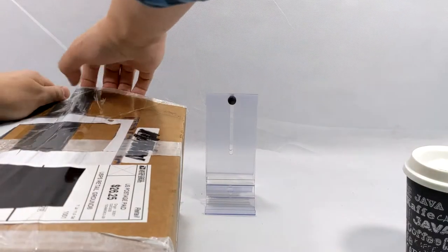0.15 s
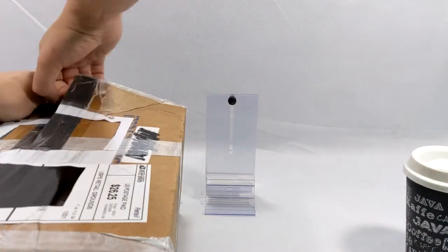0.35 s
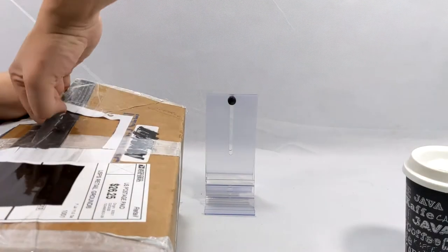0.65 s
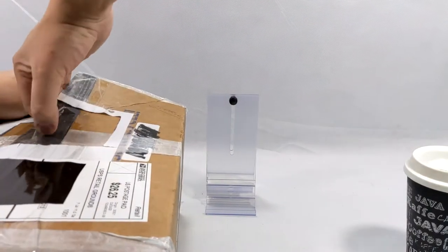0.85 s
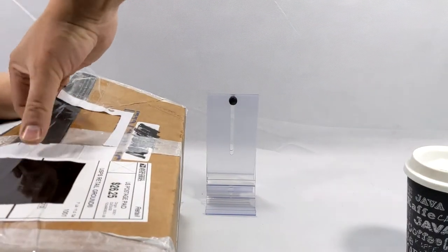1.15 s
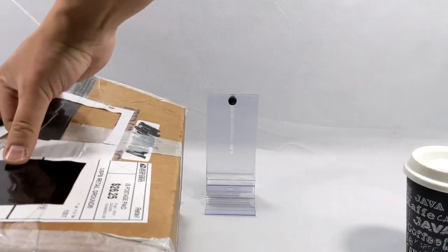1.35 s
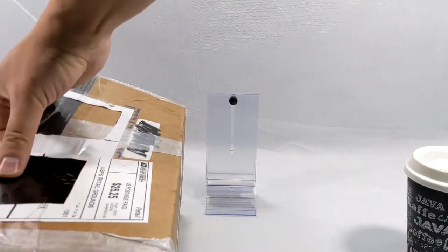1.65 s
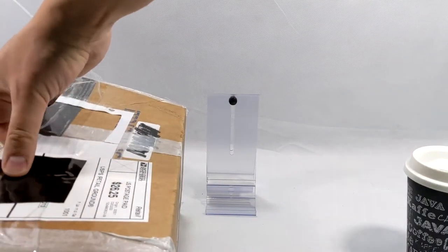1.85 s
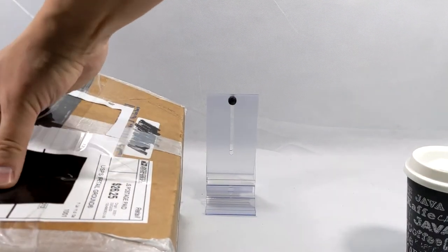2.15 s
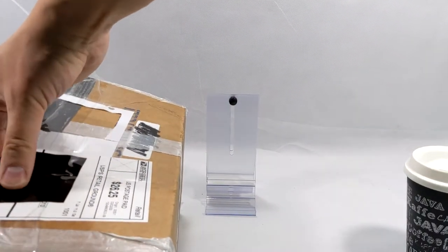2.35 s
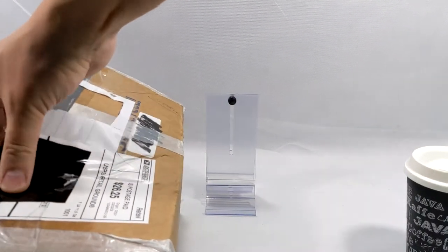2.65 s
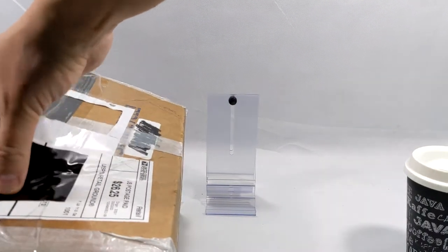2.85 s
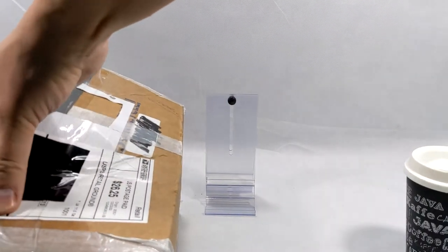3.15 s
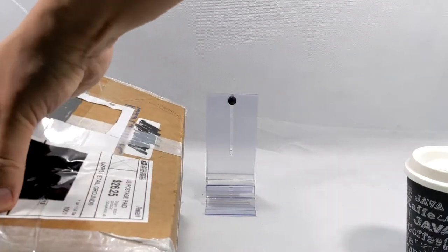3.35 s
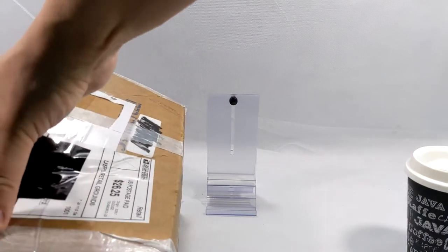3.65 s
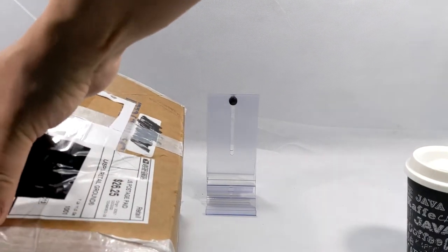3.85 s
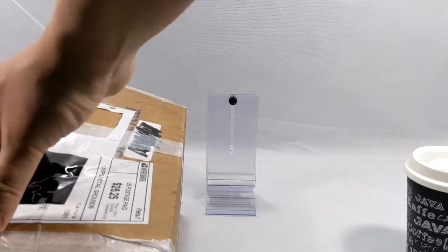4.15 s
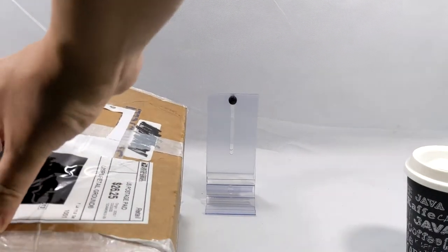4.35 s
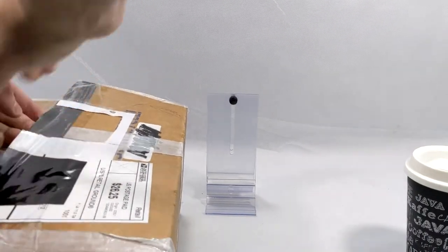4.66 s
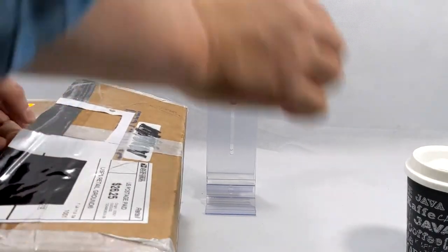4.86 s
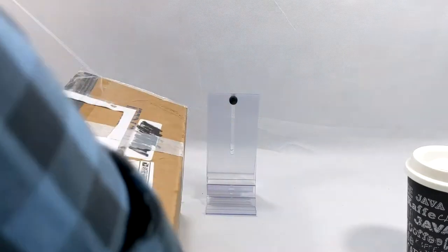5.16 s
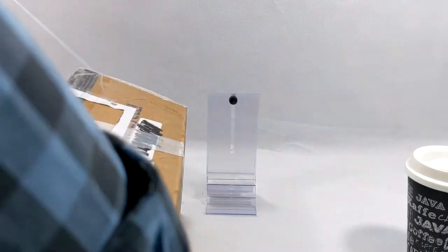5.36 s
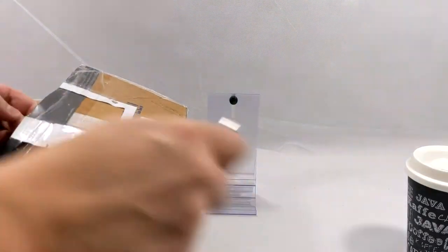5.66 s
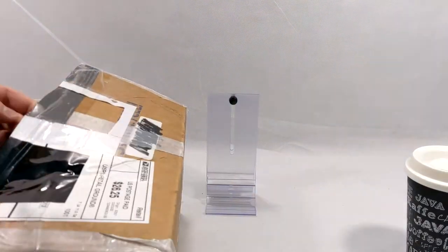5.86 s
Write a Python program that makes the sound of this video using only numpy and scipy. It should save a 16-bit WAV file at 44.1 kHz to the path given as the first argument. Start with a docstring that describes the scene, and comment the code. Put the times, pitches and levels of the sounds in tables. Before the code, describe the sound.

Plastic film and tape on a hollow cardboard box crackle sharply in tugging bursts, with soft box thumps, then fade to quiet rustles.

```python
"""Packing tape and plastic film on a cardboard box are picked at by fingers, left of two spaced microphones.
Each crease of the film gives way in a filtered noise burst; sliding film rustles as dense grains of noise.
Tugs and knocks excite decaying modes of the hollow box and the desk; sliding makes the box drone.
A small room answers with a diffuse, decaying tail, over quiet air noise and a low hum."""
import sys
import numpy as np
from scipy import signal
from scipy.fft import rfft, irfft, next_fast_len
from scipy.io import wavfile
from scipy.ndimage import uniform_filter1d

SR = 44100
rng = np.random.default_rng(int(sys.argv[2]) if len(sys.argv) > 2 else 0)


def log_audio(samples):
    """Write samples as a 16-bit WAV file to the path given in sys.argv[1]."""
    # one column per channel
    frames = np.atleast_2d(samples).T
    # limit to full scale, then quantise
    limited = np.clip(frames, -1, 1)
    pcm = np.round(limited * 32767).astype(np.int16)
    wavfile.write(sys.argv[1], SR, pcm)


def makeup_ratio(level_db):
    """Linear amplitude ratio for a level in decibels (20 dB per factor of ten)."""
    decades = np.asarray(level_db, float) / 20
    return 10 ** decades


N = 264834
SIZE = next_fast_len(N)
HZ = np.fft.rfftfreq(SIZE, 1 / SR)

# Pulls on the tape. Each row: start in seconds, length of the swell in seconds, rustle in dB, then relative
# to the rustle: sizzle in dB, body in dB, box drone in dB.
PULLS = [(0.191, .07, -42.5, -10, -3, 2), (0.271, .06, -33, -7, -2.5, 5.5), (0.919, .02, -45.5, 4.5, 3, 4),
         (1.296, 0.017, -30, 2, 5.5, 0), (1.34, .08, -30.5, -7, 2.5, 0), (1.642, 0.13, -29, -11, -0.5, -1),
         (1.77, .06, -33, -30, -0.5, -10.5), (2.057, .11, -25.5, -12, -4.5, 1),
         (2.321, .01, -34.5, -18, -25, 1), (2.562, 0.12, -22, -5.5, -5.5, -5),
         (2.77, .07, -31.5, -17, -6.5, 0.5), (3.105, .01, -28.5, -8, -9, -6),
         (3.19, .07, -36.5, -3.5, -9, 0.5), (3.268, 0.055, -39, -4, -3, 0),
         (3.39, .1, -37.5, -3.5, -22, -2), (3.631, .02, -45, 11, -7, -10), (3.671, .07, -44, -2, -7, 1.5),
         (3.84, .015, -34.5, -5, -22, -6), (3.919, .08, -34, -10, -5.5, -1),
         (4.11, .055, -38.5, -12, -4.5, 0.5), (4.545, .015, -28, -22, -9.5, 4.5)]
# Fingers brushing the film. Each row: centre in seconds, half length in seconds, rustle in dB, brightness
# in dB, then relative to the rustle: sizzle in dB, box drone in dB.
RUBS = [(.01, .06, -57.5, 3, -17, 3.5), (.39, .08, -43.5, -11, -12, 8.5), (.66, .1, -40, 1.5, -0.5, -7.5),
        (.8, .08, -52, -5, -0.5, 10), (0.989, .07, -50.5, 1, -13, 8), (1.129, .08, -58.5, -5, -1, 12.5),
        (1.26, .07, -48.5, -7, -3, 1), (1.6, 0.034, -58.5, -3, -10, 17), (1.979, .05, -58, -4, -18, 10.5),
        (2.449, .07, -55.5, 0, -3, 7), (2.97, .1, -49.5, 2, -4, 5.5), (4.329, .09, -47.5, 4, -5, -1.5),
        (4.479, 0.098, -42, -1, 0.5, -5), (4.86, .09, -48.5, 1, -2, 3.5), (4.97, .08, -56, -7, -9, 6.5),
        (5.18, .06, -59.5, -19, -1, 17.5), (5.269, 0.065, -56, -6, -3.5, 5), (5.48, .04, -60.5, -4, 0, 9),
        (5.6, .04, -58, 13, -1, -8), (5.699, .07, -51.5, -11, -4, -1.5), (5.77, .06, -54, 1, -7, -12),
        (5.83, .08, -53.5, -3, -6, -28)]
# Film that never quite rests. One row: rustle in dB, brightness in dB, then relative to the rustle:
# sizzle in dB, body in dB, box drone in dB.
STILL = -67.5, 6, 1.5, 8, 6
# Film creases giving way. Each row: time in seconds, strength in dB, pitch of the patch in Hz, then relative
# to the strength: sizzle in dB, body in dB.
SNAPS = [(.1804, -37, 5040, -9, -6), (.19, -32, 2200, -4, -1), (.205, -19.5, 2740, -8, -3),
         (.2149, -33, 2920, -17, -14), (.2563, -20, 2620, -15, -16), (.2696, -1, 2290, -30, -10),
         (.4456, -32, 2200, -22, -5), (.4627, -30.5, 2194, -18, -3), (.972, -36, 2276, -14, -1),
         (1.0042, -36, 4400, 6, -15), (1.0499, -40.5, 4670, 12.5, 0), (1.0952, -44.5, 2850, -10, 7),
         (1.1197, -37.5, 2700, -7, -9), (1.2516, -38, 2300, -3, 1), (1.295, -3.5, 2330, -22, -13),
         (1.3349, -4.5, 3060, -6, -3.5), (1.3825, -18, 2540, 9, 0), (1.5942, -42.5, 5000, -9.5, 1),
         (1.6427, -31.5, 6240, 4, 7.5), (1.6708, -20.5, 4000, 10.5, -14), (1.689, -24.5, 4470, 15, 6),
         (1.701, -2, 3040, -13, -12), (1.756, -6.5, 3700, -10, -6), (2.0466, -41, 5500, 10, -12),
         (2.0566, -11, 3640, 1, -4), (2.0853, -15, 5160, -17, -3), (2.1078, -12, 4350, -1.5, -2.5),
         (2.1453, -17, 4220, 4, 4.5), (2.169, -19, 4340, 3, -10), (2.196, -14.5, 2200, -25, -11),
         (2.3235, -22.5, 2440, -6, 3.5), (2.5015, -39, 8300, 6, -5), (2.5166, -40, 6360, 4, -9),
         (2.5614, -11.5, 4330, -6, -23), (2.5712, -14.5, 4170, -21, -7.5), (2.6053, -16.5, 3960, -7, -15),
         (2.614, -10, 5440, -1, -4), (2.6214, -9.5, 2410, -12, -9), (2.6378, -12, 5000, -15, -15),
         (2.6691, -22, 3160, 7, -7), (2.6772, -11, 4030, 3, -5), (2.7212, -22.5, 4630, 12, -13),
         (2.7312, -20.5, 4930, 4, -6), (2.7873, -14.5, 5930, 3, -6), (2.8016, -14, 5950, 0, -7.5),
         (2.8265, -14.5, 6100, 4.5, -3.5), (2.8312, -16.5, 6100, -4, -13), (2.8636, -18, 5000, -17, -8),
         (2.8712, -29, 5440, -2, 6), (2.88, -28, 5300, 7, -20), (2.9457, -42.5, 6900, 19.5, -8),
         (2.953, -42, 7500, 13, -8), (3.0141, -27, 5300, 3, -18), (3.061, -39, 4040, -10, -21),
         (3.1051, -26, 4600, 13.5, -5), (3.1134, -13.5, 5580, 2, -6), (3.1481, -24.5, 5860, 2, 11.5),
         (3.1934, -17, 7300, -13, -25), (3.21, -19, 4630, -3, -0.5), (3.2195, -27.5, 4720, 3, 2),
         (3.2665, -18, 4240, 4, 0), (3.2812, -14, 5500, -6, -22), (3.3905, -15.5, 2380, -10, -11),
         (3.4252, -30, 3500, 11, -2), (3.4298, -21, 4420, 4, 6), (3.4403, -21.5, 4850, 4, 4),
         (3.4769, -20.5, 7800, 3, -4.5), (3.5504, -37, 5800, 10, -13), (3.59, -43, 5100, 4, -27),
         (3.6102, -36, 6200, 10, -23), (3.6194, -28, 5700, 4, -28), (3.629, -25.5, 4840, 15.5, 2.5),
         (3.6636, -18, 5300, 11.5, -4), (3.693, -24, 5700, 11.5, -9), (3.8378, -17.5, 4600, -1, -13),
         (3.843, -19.5, 4750, 1, -2.5), (3.903, -22, 5130, 3, -7), (3.9282, -17, 5300, 2, -1),
         (3.9457, -14, 5370, -7, -28), (3.9581, -9, 5070, -7, -6.5), (3.9693, -12, 5900, -4, -34),
         (4.11, -37, 8300, -1, -18), (4.134, -38, 5300, 16.5, -26), (4.154, -24.5, 2440, -29, 2.5),
         (4.1812, -24.5, 7700, 4.5, -21), (4.2712, -24, 4600, 6.5, -26), (4.473, -33, 4700, 4, -31),
         (4.5312, -21.5, 2640, 2, 3.5), (4.544, -7.5, 5100, -39, -4), (4.556, -17.5, 3400, -24, -22),
         (4.604, -29, 4700, -2, -17), (4.797, -31.5, 5570, 1, -30), (4.886, -39, 6900, -1, 0),
         (4.9489, -37, 3480, -7, -15), (5.13, -56, 2440, -6, 19.5), (5.4552, -56, 5700, 14, -10),
         (5.4655, -45, 2710, -6, -9), (5.534, -57, 6170, 11, 10), (5.9357, -54.5, 6300, 12, -15)]
# Spectrum of the film's grains. Each row: frequency in Hz, gain in dB.
FILM_COLOUR = [(350, -29), (600, -9.5), (897, -7.5), (1340, -2), (2210, -3), (4420, -6.5), (7590, 0),
               (13400, -12.5), (15200, -8.5), (16500, -34)]
# Tugs and knocks on the box. Each row: time in seconds, then levels of walls, flaps and deep modes in dB.
KNOCKS = [(0.065, -34.5, -40.5, -52), (0.208, -31, -27.5, -54), (.27, 1, -26, -17.5), (.28, -6, -9, -20),
          (0.34, -28, -21, -26), (0.39, -20, -48.5, -41), (.404, -31.5, -38.5, -19),
          (.463, -21.5, -46, -50), (0.479, -37, -46, -26), (.536, -34.5, -41, -54),
          (0.664, -22, -28.5, -36), (.723, -25.5, -51, -53), (0.919, -24.5, -30.5, -45),
          (0.962, -30, -51, -51), (1.108, -25, -48, -44), (1.223, -30.5, -47, -44), (1.294, -28, -9.5, -47),
          (1.334, -3, -3, -21), (1.361, -10, -36, -12), (1.374, -12, -7.5, -32), (1.43, -18.5, -12, -54),
          (1.494, -32, -19.5, -40), (1.642, -13.5, -15, -23), (1.669, -13, -29, -14.5),
          (1.719, -12, -45, -13), (1.756, -15, -18, -23.5), (1.802, -36, -20.5, -50),
          (1.875, -48, -26, -24), (2.057, -14, -46, -46), (2.087, -1, -25, -10), (2.125, -6.5, -30, -39),
          (2.205, -25, -39, -18), (2.216, -33, -42, -17), (2.325, -6, -35, -17), (2.347, -20, -42, -11.5),
          (2.561, -26, -22, -43), (2.61, -5.5, -29, -6.5), (2.657, -38, -16, -22), (2.703, -34, -15, -35),
          (2.74, -38, -16, -49), (2.787, -16, -34, -50), (2.818, -35, -15, -50), (2.864, -7.5, -22, -22.5),
          (2.888, -20, -43, -16.5), (2.927, -23, -21.5, -48), (3.114, -18.5, -42, -46),
          (3.15, -8, -26, -12.5), (3.25, -23, -20, -49), (3.281, -13, -39, -24.5), (3.392, -16, -13.5, -21),
          (3.435, -15.5, -27, -16.5), (3.629, -30, -27.5, -54), (3.662, -23.5, -21, -56),
          (3.689, -33, -31.5, -47), (3.846, -19.5, -25, -27.5), (3.906, -27, -22, -42),
          (3.929, -21.5, -16, -51), (3.96, -20, -11, -35), (4.007, -54, -30, -52), (4.106, -29, -35, -48),
          (4.151, -28, -19, -56), (4.481, -46, -32, -31), (4.545, -1, -29, -10.5), (4.563, -39, -19, -10),
          (4.588, -20, -28, -30), (4.641, -22, -41, -52), (4.822, -37, -51, -47), (4.873, -36, -49, -30),
          (4.949, -29.5, -47, -26.5), (4.971, -46, -40, -26), (5.129, -52, -32, -57),
          (5.174, -28.5, -44, -55), (5.3, -37, -50, -36), (5.546, -46, -54, -33)]
# The box bumping the desk. Each row: time in seconds, level in dB.
BUMPS = [(0.269, -14.5), (.28, -11.5), (0.343, -27), (.404, -33), (1.333, -42), (1.359, -22), (1.375, -37),
         (1.43, -39), (2.125, -39), (2.324, -31), (2.347, -31), (3.15, -39), (4.544, -22), (4.588, -39),
         (5.174, -41)]
# Modes of the box walls, the flaps, the air in the box, and the desk below. Each row: frequency in Hz,
# level in dB, undamped time to fall by 60 dB in seconds.
WALL_MODES = [(234, -0.5, 0.044), (269.7, 3.5, 0.12), (312.6, -2.5, 0.052)]
FLAP_MODES = [(362.4, 3.5, 0.074), (430.5, 1, 0.068), (494, -4, 0.087), (579, -7.5, 0.065),
              (596, -26, 0.04)]
DEEP_MODES = [(124, -14, 0.036), (144.4, -1.5, 0.23), (193.3, 2.5, 0.11)]
DESK_MODES = [(55, -21.5, 0.29), (84.5, -8, 0.079)]
# Reverberation of the room. Each row: frequency in Hz, time to fall by 60 dB in seconds.
ROOM_T60 = [(60, 0.096), (300, 0.27), (1300, 0.34), (4000, 0.21), (9000, 0.35), (16000, 0.18)]
# Spectrum of what feeds the room. Each row: frequency in Hz, gain in dB.
ROOM_COLOUR = [(60, -3), (130, -0.5), (300, -3), (700, -1.5), (1400, 0), (3000, -3), (6000, -7.5),
               (9000, -6.5), (14000, -8)]
# Spectrum of the air noise. Each row: frequency in Hz, gain in dB.
AIR_COLOUR = [(15, -46), (25, -20), (80, -33.5), (142, 9.5), (245, -5), (321, -10.5), (952, -11),
              (1320, -18), (4480, -17.5), (8600, -28), (14000, -23), (15200, -16), (16500, -50)]
# Response common to both microphones. Each row: frequency in Hz, gain in dB.
MIC_RESPONSE = [(25, -38), (40, -12), (52, -1.5), (700, 2), (950, -2.5), (1400, -1.5), (2200, -3),
                (4000, 2), (6000, 0.5), (8500, -6), (11000, 0), (14000, 2), (15800, -3.5), (16800, -42)]
# Mismatch of the capsules. Each row: frequency in Hz, left minus right in dB.
CAPSULE_MISMATCH = [(200, 1), (2000, -0.5), (6500, 0), (8500, -6.5), (10500, -2.5), (12500, -2), (14500, 5),
                    (16500, 1)]

KNOCK_PAN_DB = 2.5  # spread of left minus right: each knock moves another part of the box
KNOCK_RING = 0.89  # factor on the decay times: a hand rests on the box


def unit(x):
    """Normalization to an rms of 1."""
    return x / np.sqrt(np.mean(x ** 2))


def colour(x, points):
    """Linear filtering in the frequency domain, the gain interpolated between (Hz, dB) points."""
    hz, db = np.transpose(points)
    gain = makeup_ratio(np.interp(np.log(HZ + 1), np.log(hz), db))
    return irfft(rfft(x, SIZE) * gain, SIZE)[..., :N]


def band(x, lo_hz, hi_hz):
    """Band-pass filtering with a Butterworth response."""
    sos = signal.butter(2, [lo_hz, min(hi_hz, .45 * SR)], "bandpass", fs=SR, output="sos")
    return signal.sosfilt(sos, x)


def from_left(x):
    """Time difference of arrival: the right microphone hears the source 10 samples later."""
    return np.array([x[0], np.roll(x[1], 10)])


def handling():
    """Incoherent addition: pulls and rubs sum in power to levels in dB of rustle, sizzle, body and drone.

    The second curve returned is the brightness, weighted toward the loudest movement."""
    t = np.arange(N) / SR
    attack_s, swell_db_per_s, fade_db_per_s, pull_bright_db = 0.01, 90.5, 160.5, -4
    edge_db = -9.5  # fall of a rub at half length from its centre
    moves = [(STILL[0] + 0 * t, *STILL[1:])]
    for start_s, length_s, db, *over_db in PULLS:
        late = t - start_s - length_s
        shape_db = np.where(late < 0, swell_db_per_s, -fade_db_per_s) * late
        attack = np.clip((t - start_s) / attack_s, 1e-4, 1)
        moves.append((db + shape_db + 20 * np.log10(attack), pull_bright_db, *over_db))
    for centre_s, half_s, db, bright_db, top_db, drone_db in RUBS:
        level_db = db + edge_db * ((t - centre_s) / half_s) ** 2
        body_db = -4.5 - 0.41 * bright_db  # a bright rub has less body
        moves.append((level_db, bright_db, top_db, body_db, drone_db))
    power = makeup_ratio(np.array([move[0] for move in moves])) ** 2
    bright_db, *over_db = np.transpose([move[1:] for move in moves])
    total = power.sum(axis=0)
    parts_db = [10 * np.log10(makeup_ratio(over) ** 2 @ power) for over in over_db]
    return 10 * np.log10(total), bright_db @ power / total, *parts_db


def crinkles(rustle_db):
    """A random point process: small creases, as rows like those of SNAPS, crowd where the rustle is loud."""
    count, lowest_hz, highest_hz = 70, 2200, 6450
    share = np.cumsum(makeup_ratio(.45 * rustle_db))
    when, size, pitch, top, low = rng.random((count, 5)).T
    i = np.clip(np.searchsorted(share / share[-1], when), 64, N - 1)
    db = rustle_db[i] + 6 + 14 * (size ** 2 - .5)
    hz = lowest_hz * (highest_hz / lowest_hz) ** pitch
    return list(zip(i / SR, db, hz, -14 + 22 * top, -16 + 18 * low))


def snap(burst, hz, top_db, low_db):
    """Spectral partition: a burst is shared between the ringing patch, the film at large, sizzle and body."""
    patch = band(burst, hz / 1.436, hz * 1.274)
    film = band(burst, 1540, 8600)
    sizzle = band(burst, 8600, 20100)
    body = band(burst, 633, 1970)
    gains = makeup_ratio([-4, -2, top_db, low_db]) * [1, 1, -1, -1]  # neighbouring bands meet in opposite phase
    return sum(gain * part / np.sqrt(np.sum(part ** 2, axis=1, keepdims=True))
               for gain, part in zip(gains, (patch, film, sizzle, body)))


def snaps(rows):
    """Sudden release of strain: each crease bursts for a millisecond or two and leaves a faint tail.

    Returns the stereo direct sound, and one channel averaged over all directions for the walls."""
    length = 768
    t = np.arange(length) / SR
    near, around = np.zeros((2, N + length)), np.zeros(N + length)
    chance = rng.standard_normal((len(rows), 3, length))
    pans_db = 2 + 2 * rng.standard_normal(len(rows))  # left minus right, scattered from crease to crease
    shape = (t / 0.00064) ** 2 * np.exp(-t / 0.00033) + 0.039 * np.exp(-t / 0.0074) * (t > .001)
    click = (np.arange(length) == 44) * 1.
    for (s, db, hz, top_db, low_db), pan_db, (both, left, right) in zip(rows, pans_db, chance):
        burst = shape * np.array([both + 0.69 * left, both + 1.94 * right])  # the patch radiates unevenly
        sounds = snap(np.vstack([burst, click]), hz, top_db, low_db)
        left, right, mean = np.sqrt(SR / 1000) * makeup_ratio(db) * sounds
        i = int((s - .0008) * SR)
        near[:, i:i + length] += makeup_ratio(pan_db / 2) * left, makeup_ratio(-pan_db / 2) * right
        around[i:i + length] += mean
    return from_left(near[:, :N]), around[:N]


def rustle(mid_db, bright_db, top_db, low_db):
    """Stick-slip friction: countless tiny slips make dense grains of uneven size, coarser when pulled hard."""
    grit_db = np.clip(0.07 * (mid_db + 43), 0, 4)
    size = makeup_ratio(grit_db * np.minimum(rng.exponential(1, N), 4.0))
    size = size * (rng.random(N) < 1500 / SR)  # 1500 grains a second on average
    size = uniform_filter1d(size, size=40) + 0.19
    noise = rng.standard_normal(N) + 2.34 * rng.standard_normal((2, N))  # shared, and of each microphone
    grains = colour(size * noise, FILM_COLOUR)
    grains = grains / np.sqrt(uniform_filter1d(size ** 2, size=SR // 4))  # level out the slow changes
    top_db = np.minimum(top_db, mid_db + 3)  # the sizzle rises at most 3 dB above the rustle
    edges_hz = (600, 2460), (2200, 5000), (4200, 6360), (8500, 21000)
    levels_db = low_db, mid_db - 9.0 - bright_db / 2, mid_db - 4.5 + bright_db / 2, top_db
    parts = [makeup_ratio(db) * unit(band(grains, *hz)) for db, hz in zip(levels_db, edges_hz)]
    return from_left(sum((-1) ** k * part for k, part in enumerate(parts)))  # neighbours in opposite phase


def ring(modes, t, stretch, wobble):
    """Modal superposition: a sum of decaying sines, each struck a little differently by its wobble."""
    return sum(makeup_ratio(db + 3.6 * w) * np.sin(2 * np.pi * hz * (1 + 0.014 * w) * t) * 1000 ** (-t / (t60 * stretch))
               for (hz, db, t60), w in zip(modes, wobble))


def strike(out, s, db, modes, chance, t):
    """Impulsive excitation: adds to out one soft push that rings the modes, at a random balance of sides."""
    pan, *wobble = chance
    push = 1 - np.exp(-t / 0.0014)  # a fingertip is a soft push
    rung = ring(modes, t, KNOCK_RING, wobble)
    sides_db = np.array([[.5], [-.5]]) * KNOCK_PAN_DB * pan
    i = int(s * SR)
    out[:, i:i + len(t)] += makeup_ratio(db + sides_db) * push * rung / np.abs(rung).max()


def box(drone_db):
    """Resonance: knocks ring the modes of box and desk, and the noise of sliding fingers keeps the box droning."""
    t = np.arange(SR // 3) / SR
    shell, desk = np.zeros((2, 2, N + len(t)))
    groups = WALL_MODES, FLAP_MODES, DEEP_MODES
    chance = rng.standard_normal((len(KNOCKS), len(groups), len(FLAP_MODES) + 1))
    for (s, *levels_db), draws in zip(KNOCKS, chance):
        for modes, db, draw in zip(groups, levels_db, draws):
            strike(shell, s, db, modes, draw, t)
    for (s, db), draw in zip(BUMPS, rng.standard_normal((len(BUMPS), len(DESK_MODES) + 1))):
        strike(desk, s, db, DESK_MODES, draw, t)
    wall, flap, deep = (ring(modes, t, 0.77, np.zeros(len(modes))) for modes in groups)
    response = wall + makeup_ratio(-11) * flap + makeup_ratio(-3.0) * deep
    scrape = rng.standard_normal(N) + 0.29 * np.array([[.5], [-.5]]) * rng.standard_normal(N)
    drone = makeup_ratio(drone_db) * unit(signal.fftconvolve(scrape, response[None], axes=1)[:, :N])
    # the small box cannot radiate below its lowest mode
    high_pass = signal.butter(5, 100, "highpass", fs=SR, output="sos")
    shell = signal.sosfilt(high_pass, shell[:, :N] + drone)
    return from_left(shell + desk[:, :N])


def diffuse():
    """Diffuse-field coherence: noise from all sides is alike only where the wave outspans the spacing."""
    spacing_m, sound_m_per_s = 0.13, 343
    alike = 0.99 * np.sinc(2 * HZ * spacing_m / sound_m_per_s)
    mid, side = rfft(rng.standard_normal((2, SIZE)))
    spectra = mid * np.sqrt(1 + alike) + np.array([[1], [-1]]) * side * np.sqrt(1 - alike)
    return unit(irfft(spectra, SIZE)[:, :N])


def room(x):
    """Reverberation: convolution with a diffuse tail whose octave bands each decay at their own rate."""
    t = np.arange(SR // 2) / SR
    noise, tail = diffuse()[:, :SR // 2], 0
    onset = np.clip((t - .002) / 0.0035, 0, 1)
    table_hz, table_s = np.transpose(ROOM_T60)
    for k, hz in enumerate(60 * 2. ** np.arange(9)):
        t60 = np.interp(np.log(hz), np.log(table_hz), table_s)
        part = band(noise, hz / np.sqrt(2), hz * np.sqrt(2)) * 1000 ** (-t / t60) * onset
        part = part * np.sqrt(hz / SR / np.sum(part ** 2))
        tail = tail + (-1) ** k * part  # neighbouring bands meet in opposite phase
    return signal.fftconvolve(colour(x, ROOM_COLOUR)[None], tail, axes=1)[:, :N]


def air():
    """Stationary background: diffuse coloured noise, and narrow-band noise heard as a low, unsteady hum."""
    hum_hz = 54
    hum = unit(band(diffuse(), hum_hz - 7, hum_hz + 7))
    return makeup_ratio(-54) * unit(colour(diffuse(), AIR_COLOUR)) + makeup_ratio(-60.5) * hum


def scene():
    """Superposition of film and box, the answer of their room, and the air of the room."""
    *film_db, drone_db = handling()
    cracks, cracks_around = snaps(SNAPS + crinkles(film_db[0]))
    slips = rustle(*film_db)
    hollow = box(drone_db)
    answer = room(cracks_around + slips[0] + hollow[0])
    return cracks + slips + hollow + answer + air()


def roll_off(x):
    """The treble ends steeply here."""
    return signal.sosfilt(signal.butter(12, 17130, fs=SR, output="sos"), x)


def record(dry):
    """Transduction: two slightly unlike capsules, saturation that rounds the loudest peaks, a steep low-pass."""
    pair = []
    for x, side in zip(colour(dry, MIC_RESPONSE), (1, -1)):
        pair.append(colour(x, [(hz, side * db / 2) for hz, db in CAPSULE_MISMATCH]))
    rounded = np.tanh(0.68 * np.array(pair)) / 0.97
    top_cut = signal.ellip(8, .2, 70, 16800, fs=SR, output="sos")
    mix = signal.sosfilt(top_cut, rounded)
    return roll_off(mix)


dry = scene()
out = record(dry)
log_audio(out)
```